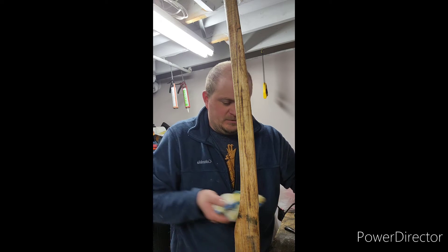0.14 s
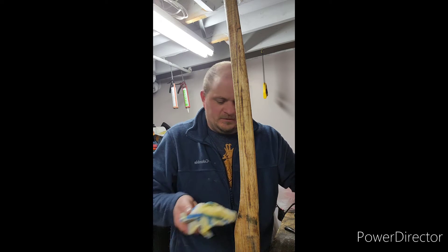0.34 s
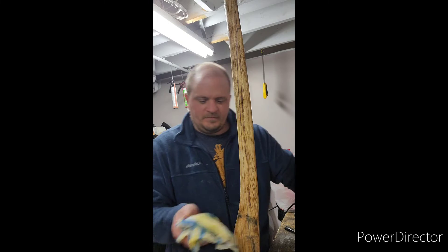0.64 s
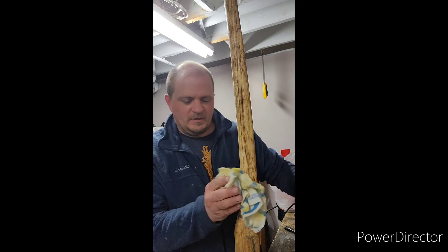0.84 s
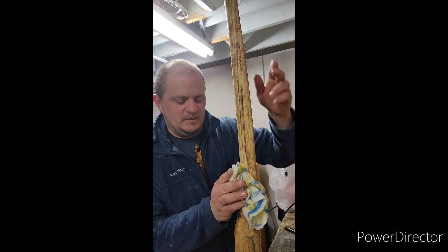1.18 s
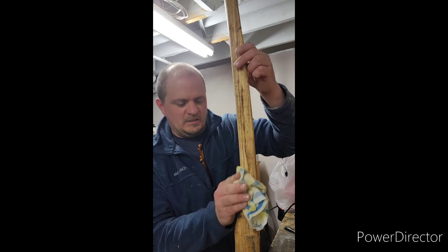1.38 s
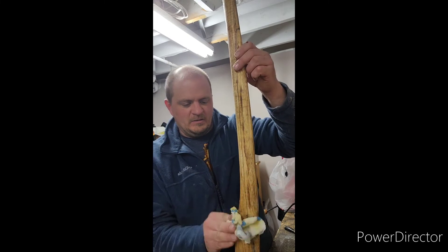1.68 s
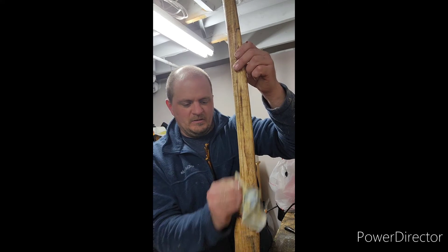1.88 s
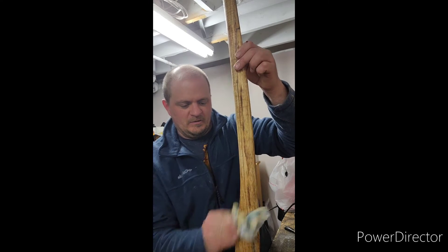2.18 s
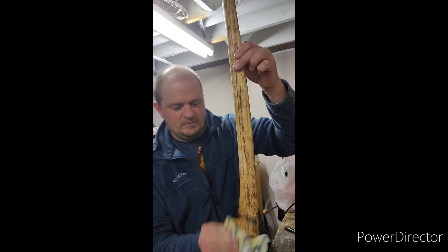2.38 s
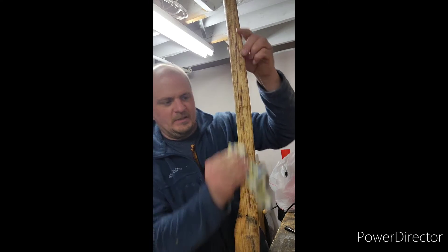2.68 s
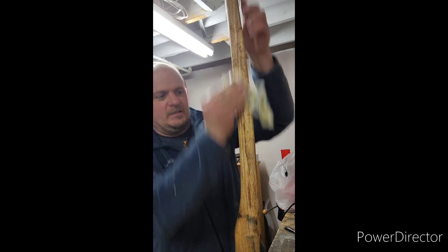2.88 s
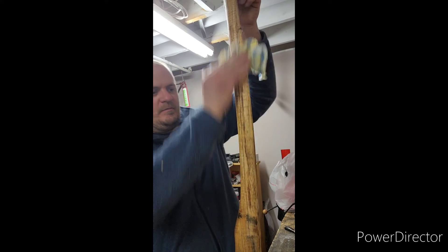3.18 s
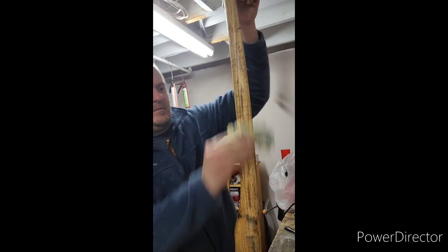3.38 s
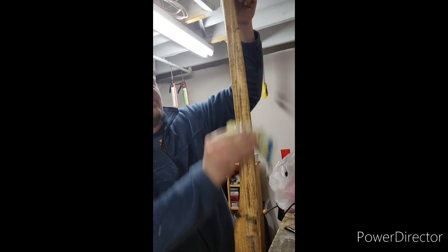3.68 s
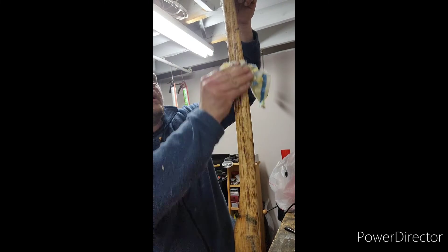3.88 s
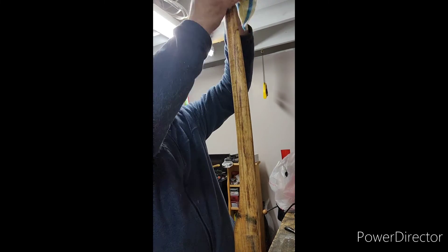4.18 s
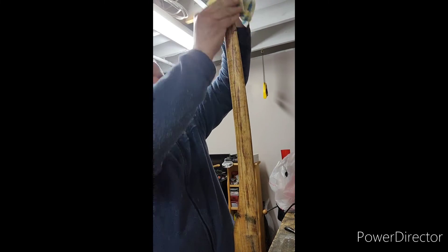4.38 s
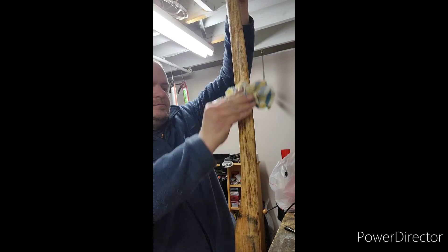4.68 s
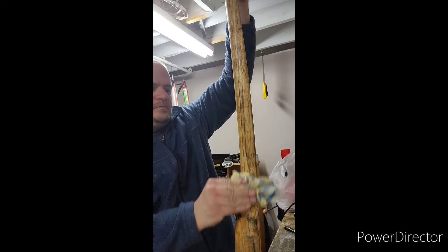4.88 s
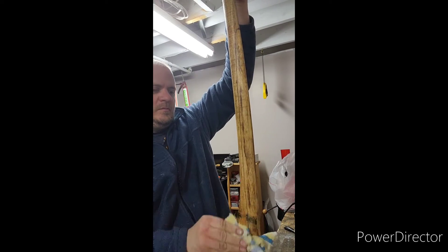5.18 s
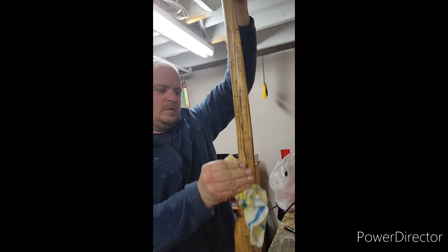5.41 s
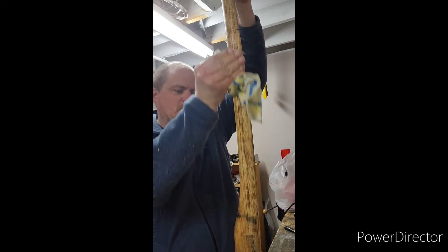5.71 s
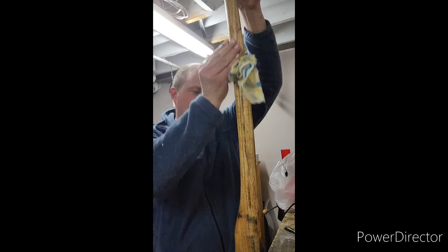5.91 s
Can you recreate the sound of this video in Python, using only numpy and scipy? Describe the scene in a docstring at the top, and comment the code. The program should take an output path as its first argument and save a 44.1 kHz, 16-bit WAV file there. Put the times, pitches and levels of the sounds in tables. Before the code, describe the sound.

A close stereo view of an indoor workshop, with short room reflections and a faint, steady low mains hum under soft air. Right at the start, until about 0.13 s, a tin lands on a wooden bench in a rapid cluster of thuds, bright metallic clashes and scuffing, with a weaker bounce at 0.2 s. From 0.25 to 0.29 s a plastic bottle knocks in a hollow stutter, with deep dull bumps until 0.32 s. Soft uneven taps follow until 0.9 s while cloth rustles almost inaudibly; a dry finger tick comes at 1.0 s. From 1.4 s a rag rubs a long dry wooden handle: quiet, breathy, grainy strokes, several short ones, then longer ones from 2.4 to 5.2 s, sinking nearly to silence at turns. Low bumps fall near 2.4 s. A brisker stroke at 5.3 s is followed by a sharp tick at 5.6 s, then rubbing fades by 6.1 s.

```python
"""First a tin lands on a wooden bench with thuds and bright clashes, scuffing as it bounces.
A plastic bottle knocks and taps as it rocks to rest: each contact sets off fading tones, and some noise.
Cloth rustles in the hand, then an oily rag rubs a long dry wooden handle: noise that follows the
hand's speed, with wood tones inside it, sinking almost to silence where a stroke eases into a turn.
A steady mains hum and faint room air lie under everything, with a few ticks and dull bumps."""
import sys
import numpy as np
from scipy import signal
from scipy.fft import rfft, irfft
from scipy.io import wavfile

SR = 44100
rng = np.random.default_rng(int(sys.argv[2]) if len(sys.argv) > 2 else 0)


def pcm_store(signal):
    """Save signal as 16-bit PCM."""
    levels = np.round(np.clip(np.atleast_2d(signal), -1, 1) * 32767)
    wavfile.write(sys.argv[1], SR, levels.astype(np.int16).T)


N = 266662
TIME = np.arange(N) / SR
FREQS = np.maximum(np.fft.rfftfreq(N, 1 / SR), 1)

# Levels in the tables are strengths before each source's own mixing; colours are in dB per Hz.
# strokes of the rag: start_s, end_s, friction_db, speeding_up_s, slowing_down_s,
# top_hiss_db (against the friction), handle_thrum_db (relative)
STROKES = [(1.429, 1.826, -57.5, 0.31, 0.1, -12, 0), (1.824, 2.123, -56.5, 0.14, 0.17, -9, 0),
           (2.125, 2.42, -57.5, 0.099, 0.055, -11, -5.5), (2.388, 3.29, -57.5, 0.3, 0.42, -9, -2.5),
           (3.206, 3.652, -59, 0.13, 0.12, -8.5, 3), (3.651, 4.374, -59.5, 0.086, 0.22, -6.5, 1.5),
           (4.391, 5.247, -59, 0.1, 0.094, -9, 4), (5.286, 5.527, -54.5, 0.16, 0.19, -4.5, -1),
           (5.29, 5.982, -61.5, 0.41, 0.2, -7.5, -0.5), (5.837, 6.15, -72, 0.054, .1, -14.5, 8)]
# rag gathered up in the hand: start_s, end_s, level_db
GATHERINGS = [(0.345, 1.056, -79)]
# colour of the friction noise: pitch_hz, level_db
RUB_COLOUR = [(200, 1), (340, -27.5), (600, -15.5), (1000, -7), (1650, -4), (2400, -1.5), (3400, 0),
              (4500, -3), (6300, -7.5), (7200, -5), (8300, -21.5), (10500, -29), (16000, -41)]
# colour of the fine fibre hiss: pitch_hz, level_db
HISS_COLOUR = [(5000, -25.5), (8000, -7), (10500, -11.5), (12200, -3.5), (15500, -3.5), (17000, -16.5)]
# bending tones of the handle under the rag: pitch_hz, width_hz, level_db
HANDLE_TONES = [(359, 68, -19.5), (545, 54, -22.5), (698, 150, -21.5), (1387, 60, -22.5), (1818, 62, -20),
                (2010, 120, -19), (3035, 400, -14), (3516, 92, -14), (3753, 270, -13), (4190, 99, -21),
                (5645, 250, -20.5)]
# rough spots where the rag drags harder: time_s, extra_friction_db, extra_thrum_db
ROUGH_SPOTS = [(2.22, 3, 9), (2.365, -1, 10.5), (2.77, 3, -5), (2.844, 3.5, 3), (3.56, 1.5, 0),
               (3.99, 3, 8.5), (5.0, 3, 2), (5.39, 0.5, -0.5), (5.83, 4.5, 11)]
# tin on the bench: time_s, thud_db, contact_hardness_hz, clash_db, brightness_db (above 8 kHz)
TIN_HITS = [(0.0254, -30.5, 980, -24.5, 0), (0.035, -39, 600, -33.5, -4), (0.0416, -34, 352, -45, -3),
            (0.0506, -35.5, 560, -42.5, -8.5), (0.07, -26, 402, -30, -13), (0.0805, -40.5, 600, -33, -6.5),
            (0.089, -40.5, 400, -39.5, -12), (0.116, -46, 700, -37, -3.5), (0.125, -44.5, 500, -48, -14),
            (0.2127, -45.5, 1100, -51.5, -17)]
# ringing tones of the bench top: pitch_hz, level_db, fade_by_60_db_s
BENCH_TONES = [(73.4, -14, 1), (137.7, -2, 0.2), (181.4, -4, 0.28), (212.6, 0, 0.11), (267, 5, 0.061),
               (348.3, -6, 0.18), (402.2, -9, 0.22), (431, -9.5, 0.033), (510, -7.5, 0.14),
               (623, -16.5, 0.2), (775, -18, 0.14)]
# ringing tones of the tin wall: pitch_hz, level_db, fade_by_60_db_s
TIN_TONES = [(998, -13, 0.15), (1230, -9, 0.11), (1325, -14, 0.12), (2869, -19, 0.2), (3343, -22, 0.17),
             (4307, -21, 0.2), (5884, -19, 0.23), (6530, -18.5, 0.23), (6551, -17.5, 0.24),
             (6826, -19, 0.2)]
# colour of the tin's crash, its many crowded upper tones: pitch_hz, level_db
CLASH_COLOUR = [(200, -3), (550, 8.5), (800, -5.5), (1300, -7), (1800, -13.5), (3200, 0.5), (4600, -5),
                (6700, 1.5), (8200, -10.5), (12000, -5), (15500, -8)]
# tin scuffing over the bench around its bounces: start_s, end_s, level_db
SCUFFS = [(0.004, 0.071, -42), (0.184, 0.263, -54.5)]
# colour of a scuff: pitch_hz, level_db
SCUFF_COLOUR = [(60, -11), (200, -3.5), (460, -1), (800, -19), (1250, -15), (2000, -22.5), (3500, -22),
                (9000, -41)]
# bottle knocked against the bench: time_s, level_db, brightness_db (in the upper part of the clatter)
BOTTLE_HITS = [(0.2548, -35.5, -2.5), (0.2665, -36, 5.5), (0.2735, -41, -15), (0.2805, -36, -25)]
# ringing tones of the bottle body: pitch_hz, level_db, fade_by_60_db_s
BOTTLE_TONES = [(190, -6, 0.2), (308, -6, 0.04), (438, 1, 0.16), (530, 4, 0.08), (775, -13, 0.17),
                (945, -9, 0.1), (1326, -5, 0.11), (1548, -1, 0.08), (2270, -13, 0.12)]
# colour of the bottle's clatter: pitch_hz, level_db
CLATTER_COLOUR = [(200, -5), (550, 3), (1000, -5), (1600, -6.5), (2300, -11.5), (3700, -11.5),
                  (4700, -25.5), (6300, -24), (8500, -48), (15000, -62)]
# soft taps as the bottle rocks: time_s, level_db, contact_hardness_hz
TAPS = [(0.3648, -49.5, 3000), (0.432, -52, 3000), (0.656, -57, 1100), (0.7193, -52.5, 1510),
        (0.778, -68, 1310), (0.813, -57, 1300), (0.876, -63.5, 1200)]
# hollow ring of a tap: pitch_hz, level_db, fade_by_60_db_s
TAP_TONES = [(336, -2.5, 0.056), (553, 7.5, 0.024), (684, 6, 0.01), (1113, -10, 0.02)]
# dry ticks of fingers on the wood: time_s, level_db, lowest_hz, highest_hz
TICKS = [(0.9895, -42.5, 1250, 6900), (5.578, -35.5, 1700, 2900)]
# ring of the handle, gripped and flicked: pitch_hz, level_db, fade_by_60_db_s
TICK_TONES = [(1330, -14, 0.06), (1940, 3, 0.022), (2740, -2, 0.02), (3460, -6, 0.042), (4150, -8, 0.03),
              (5560, -9, 0.033)]
# thin snap of the cloth: time_s, level_db, pitch_hz, width_hz
SNAPS = [(0.878, -57.5, 11000, 8750)]
# dull bumps against bench and handle: time_s, level_db, pitch_hz, fade_by_60_db_s
BUMPS = [(0.276, -38.5, 97.3, 0.12), (0.289, -31, 45.6, 0.16), (0.32, -29, 45.4, 0.11),
         (1.503, -48.5, 130, 0.13), (2.396, -40, 38.3, 0.39), (2.423, -38.5, 53, 0.11),
         (3.975, -58, 364, 0.096)]
# mains hum: pitch_hz, level_db (rms)
HUM_TONES = [(59.2, -60.5), (118.6, -75), (177.6, -68)]
# colour of the room air: pitch_hz, level_db
AIR_COLOUR = [(20, -25), (50, 0), (85, -5.5), (130, -16.5), (190, -10.5), (260, -30.5), (350, -17.5),
              (530, -26.5), (650, -31), (1350, -26.5), (2200, -31), (3600, -32), (4800, -42), (7000, -41.5),
              (9000, -52)]
# width of the noisy sounds: pitch_hz, side_minus_mid_db
WIDTH = [(60, -2), (200, -9.5), (380, -7), (700, -1), (1300, 0.5), (15000, 0)]
# colour difference of the two microphones: pitch_hz, left_minus_right_db
MIC_BALANCE = [(150, -.5), (350, -1), (700, -.5), (3500, -1), (5200, 5.5), (7000, 6.5), (9500, 1),
               (13000, -3)]

CUTOFF_HZ = 15700
ROOM_T60_S = 0.35  # time for the room's tail to fade by 60 dB
LEFT_LAG_S = 0.00026  # direct knocks and taps reach the left microphone this much later
SPEED_POWER = 1.98  # friction amplitude grows as this power of the hand's speed
WOOD_GROWTH = 0.3  # the thrum swells only as this power of the friction
THRUM_BELOW_HZ = 1000  # tones below this follow the push on the wood, those above the friction
SPOT_S = 0.036  # about half the time it takes to cross a rough spot
GATHER_EASE_S, SCUFF_EASE_S = 0.38, 0.029
TURN_DB, TURN_TOP_DB = -80.5, -8.5  # the rag still creeps at a turn; its top hiss relative to that


def from_db(db):
    """Turn decibels into a gain."""
    return 10 ** (np.asarray(db) / 20)


def rms_one(x):
    """Scale a sound to an rms level of 1."""
    return x / np.sqrt(np.mean(x ** 2) + 1e-20)


def gain_curve(points):
    """Join (pitch_hz, level_db) points into a gain at every frequency."""
    hz, db = np.transpose(points)
    return from_db(np.interp(np.log(FREQS), np.log(hz), db))


def pan(db):
    """Left and right gains for a left-minus-right level difference."""
    return from_db(np.array([[db], [-db]]) / 2)


def noise(gains):
    """Stereo noise of a given colour; the side part makes left and right differ."""
    mid, side = rfft(rng.standard_normal((2, N))) * gains
    side = side * gain_curve(WIDTH)
    return irfft([mid + side, mid - side], N) / np.std(irfft(mid, N))


def peak(hz, width_hz):
    """A resonance lets through a narrow band around its pitch."""
    return 1 / (1 + ((FREQS - hz) / width_hz * 2) ** 2)


def drift(rate_hz):
    """Random wandering with rms 1, mostly slower than the given rate."""
    return rms_one(irfft(rfft(rng.standard_normal(N)) / (1 + (FREQS / rate_hz) ** 2), N))


def clicks(times, db):
    """One sharp push for each contact."""
    force = np.zeros(N)
    force[(np.atleast_1d(times) * SR).astype(int)] = from_db(db)
    return force


def soften(force, hz):
    """A soft contact has no sharp edge, so its high frequencies are filtered away."""
    return signal.sosfilt(signal.butter(2, min(hz, 10000), fs=SR, output="sos"), force)


def ring(force, tones):
    """Each push sets every tone of an object ringing as a dying sine."""
    out = 0
    for hz, db, t60 in tones:
        decay = from_db(-60 / (t60 * SR))
        turn = 2 * np.pi * hz / SR
        feedback = [1, -2 * decay * np.cos(turn), decay * decay]
        out = out + from_db(db) * signal.lfilter([0, np.sin(turn)], feedback, force + 1e-18)
    return out


def fade(force, crack_t60, tail_t60, tail_db):
    """After each push: a 2 ms swell, a crack and a quieter tail, summed in power."""
    swell = SR // 500
    power = signal.lfilter(np.ones(swell) / swell, [1], force ** 2) + 1e-24
    crack = signal.lfilter([1], [1, -from_db(-120 / (crack_t60 * SR))], power)
    tail = signal.lfilter([1], [1, -from_db(-120 / (tail_t60 * SR))], power)
    return np.sqrt(crack + from_db(tail_db) ** 2 * tail)


def workshop(x, wet_db):
    """Direct sound reaches the right first; a short room tail differs at each ear."""
    t = TIME[:SR // 2]
    tail = rng.standard_normal((2, len(t))) * from_db(-60 * t / ROOM_T60_S) * (t > 0.004)
    tail = tail / np.sqrt(np.sum(tail ** 2) / 2)
    late = irfft(rfft(x) * np.exp(-2j * np.pi * FREQS * LEFT_LAG_S), N)
    room = signal.fftconvolve(x[None], tail, axes=1)[:, :N]
    return np.array([late, x]) + from_db(wet_db) * room


def glancing(x, paths_s=(0.0013, 0.0037, 0.0079), echo=0.9, sway_s=0.00018):
    """Echoes off arm, chest and bench: their delays wander slowly, so the colour shifts."""
    out = x.copy()
    for path in paths_s:
        heard = TIME - path - sway_s * drift(1.5)
        out += echo * np.array([np.interp(heard, TIME, channel) for channel in x])
    return out / np.sqrt(1 + len(paths_s) * echo ** 2)


def crash(times, db, bright_db, colour, split_hz, crack_t60, tail_db, tail_t60, rattle_db):
    """Tones too crowded to tell apart flare as noise at each contact and rattle as they die."""
    body = glancing(noise(gain_curve(colour))) * from_db(rattle_db * drift(150))
    top = irfft(rfft(body) * (FREQS > split_hz), N)
    low_part = (body - top) * fade(clicks(times, db), crack_t60, tail_t60, tail_db)
    # the top has its own level at each contact
    top_part = top * fade(clicks(times, db + bright_db), crack_t60, tail_t60, tail_db)
    return low_part + top_part


def hand_speed(start, end, rise_s, fall_s):
    """A movement speeds up from rest, glides and slows to rest again: 0 to 1."""
    up, down = np.clip([(TIME - start) / rise_s, (end - TIME) / fall_s], 0, 1)
    return np.sin(np.pi / 2 * up) * np.sin(np.pi / 2 * down)


def room_tone(air_db=-68):
    """A steady mains hum of pure tones over soft air noise."""
    hum = 0
    for hz, db in HUM_TONES:
        hum = hum + np.sqrt(2) * from_db(db) * np.sin(2 * np.pi * (hz * TIME + rng.random()))
    return hum + from_db(air_db) * noise(gain_curve(AIR_COLOUR))


def tick(s, db, low_hz, high_hz, crack_db=-7):
    """A short dry crack at the contact while a few tones of the handle ring briefly."""
    force = clicks(s, db)
    envelope = fade(force, crack_t60=0.016, tail_t60=0.12, tail_db=-19)
    crack = from_db(crack_db) * noise(gain_curve(RUB_COLOUR)) * envelope
    wood = workshop(ring(force, TICK_TONES), wet_db=-14)
    band = signal.butter(4, [low_hz, high_hz], "band", fs=SR, output="sos")
    return signal.sosfilt(band, wood + crack)


def handling(snap_t60=0.044):
    """Dry finger ticks, a noisy snap of cloth and dull bumps that each ring at one pitch."""
    ticks = sum(tick(*row) for row in TICKS)
    snaps = 0
    for s, db, hz, width in SNAPS:
        envelope = fade(clicks(s, db), snap_t60, tail_t60=0.2, tail_db=-13)
        snaps = snaps + noise(peak(hz, width)) * envelope
    bumps = sum(ring(clicks(s, db), [(hz, 0, t60)]) for s, db, hz, t60 in BUMPS)
    return ticks + snaps + bumps


def scuffing(chatter_db=3):
    """The tin's base drags unevenly over the bench, making flickering noise."""
    slide = 0
    for start, end, db in SCUFFS:
        slide = slide + from_db(db) * hand_speed(start, end, SCUFF_EASE_S, SCUFF_EASE_S)
    return slide * from_db(chatter_db * drift(80)) * noise(gain_curve(SCUFF_COLOUR))


def tin(lead_s=0.002, metal_db=-4, clash_db=5.0):
    """The tin lands and bounces: the bench thuds, then the metal clashes and rings."""
    s, _, _, hit_db, bright_db = np.transpose(TIN_HITS)
    force = sum(soften(clicks(at - lead_s, db), hz) for at, db, hz, _, _ in TIN_HITS)
    thud = workshop(ring(force, BENCH_TONES), wet_db=-11.0)
    metal = workshop(ring(clicks(s, hit_db + metal_db), TIN_TONES), wet_db=-19.0)
    clash = crash(s, hit_db + clash_db, bright_db, CLASH_COLOUR, split_hz=8000,
                  crack_t60=0.03, tail_db=-15, tail_t60=0.16, rattle_db=2.0)
    return thud * pan(-1.3) + (metal + clash) * pan(-0.5)


def bottle(body_db=-3, clatter_db=-1, contact_hz=2500):
    """A quick stutter of hollow plastic knocks: ringing body tones plus noisy clatter."""
    s, db, bright_db = np.transpose(BOTTLE_HITS)
    force = soften(clicks(s, db + body_db), contact_hz)
    body = workshop(ring(force, BOTTLE_TONES), wet_db=-15.5)
    clatter = crash(s, db + clatter_db, bright_db, CLATTER_COLOUR, split_hz=2900,
                    crack_t60=0.06, tail_db=-12.0, tail_t60=0.22, rattle_db=2.5)
    return (body + clatter) * pan(-1.7)


def rocking():
    """The bottle's base gives soft, hollow, uneven taps as it settles."""
    force = sum(soften(clicks(s, db), hz) for s, db, hz in TAPS)
    return workshop(ring(force, TAP_TONES), wet_db=-6.5) * pan(-2.3)


def gathering(crumple_db=3, hiss_db=-19):
    """Loose cloth rustles in the hand before the first stroke: noise that crumples unevenly."""
    motion = 0
    for start, end, db in GATHERINGS:
        motion = motion + from_db(db) * hand_speed(start, end, GATHER_EASE_S, GATHER_EASE_S)
    cloth = glancing(noise(gain_curve(RUB_COLOUR)))
    cloth = cloth + from_db(hiss_db) * noise(gain_curve(HISS_COLOUR))
    return motion * from_db(crumple_db * drift(20.8)) * cloth


def friction():
    """A faster hand rubs harder: strength of the rub, its top hiss and the push on the wood."""
    # the creep sets in with the first stroke
    creep = from_db(TURN_DB) * np.clip((TIME - STROKES[0][0]) / STROKES[0][3], 0, 1)
    rub, hiss, push = creep, creep * from_db(TURN_TOP_DB), np.zeros(N)
    for start, end, db, rise_s, fall_s, top_db, wood_db in STROKES:
        stroke = from_db(db) * hand_speed(start, end, rise_s, fall_s) ** SPEED_POWER
        rub = np.hypot(rub, stroke)
        hiss = np.hypot(hiss, stroke * from_db(top_db))
        push = np.maximum(push, stroke ** WOOD_GROWTH * from_db(wood_db))
    drag_db, thrum_db = np.zeros(N), np.zeros(N)
    for s, extra_drag_db, extra_thrum_db in ROUGH_SPOTS:
        spot = np.exp(-((TIME - s) / SPOT_S) ** 2)
        drag_db += extra_drag_db * spot
        thrum_db += extra_thrum_db * spot
    drag = from_db(drag_db)
    return rub * drag, hiss * np.sqrt(drag), push / push.max() * from_db(thrum_db)


def rubbing(rub_db=-2.5, hiss_db=-1.6, judder_db=0.97, wander_db=3.5, wander_hz=11, thrum_db=-59.0):
    """Countless fibres catch and slip on the grain, making noise and stirring the wood's tones."""
    rub, hiss, push = friction()
    grip = from_db(judder_db * drift(26))
    fibres = rub * from_db(rub_db) * glancing(noise(gain_curve(RUB_COLOUR)))
    fibres += hiss * from_db(hiss_db) * noise(gain_curve(HISS_COLOUR))
    # each tone comes and goes at random, as the rag slides over the points where it stands still
    wood = 0
    for hz, width, db in HANDLE_TONES:
        drive = push * from_db(thrum_db) if hz < THRUM_BELOW_HZ else rub
        level = from_db(db + wander_db * drift(wander_hz))
        wood = wood + drive * level * noise(peak(hz, width))
    return grip * (fibres + wood)


def scene():
    """Room, bench sounds, handling and rubbing add up in the air."""
    background = room_tone() + handling()
    bench = scuffing() + tin() + bottle() + rocking()
    return background + bench + gathering() + rubbing()


def record(dry, low_cut_hz=29):
    """Two microphones differ in colour; the deepest bass is reduced and the top is cut steeply."""
    balance = gain_curve(MIC_BALANCE) ** np.array([[0.5], [-0.5]])
    heard = irfft(rfft(dry) * balance, N)
    heard = signal.sosfilt(signal.butter(2, low_cut_hz, "high", fs=SR, output="sos"), heard)
    return signal.sosfilt(signal.ellip(10, 0.1, 80, CUTOFF_HZ, fs=SR, output="sos"), heard)


dry = scene()
out = record(dry)
pcm_store(out)
```